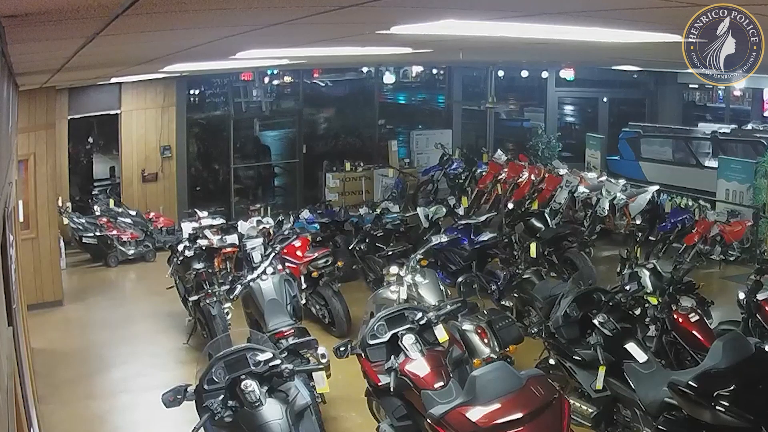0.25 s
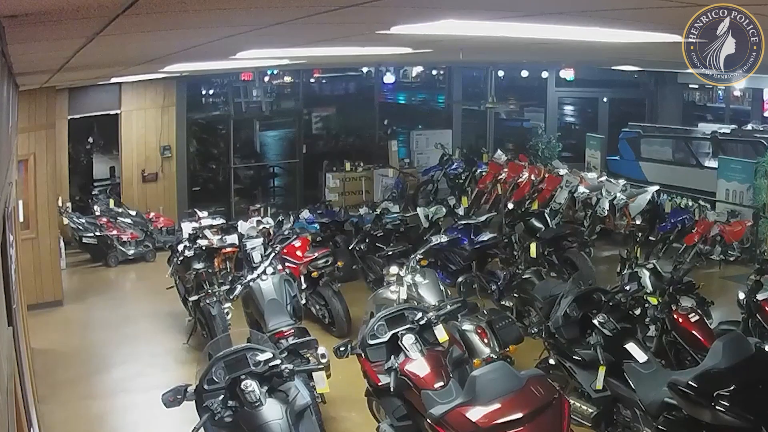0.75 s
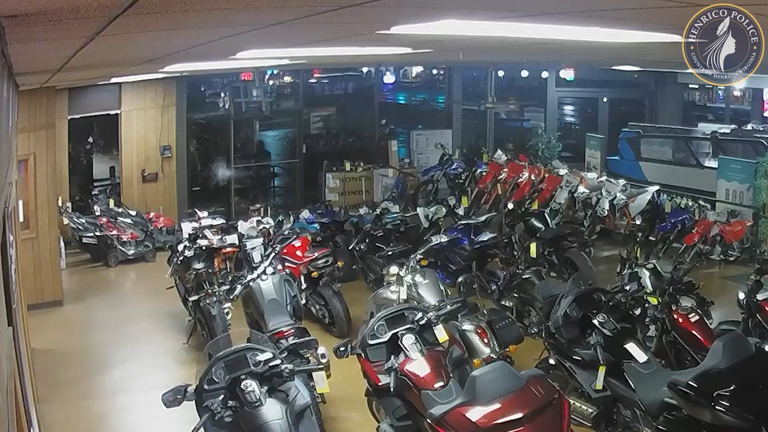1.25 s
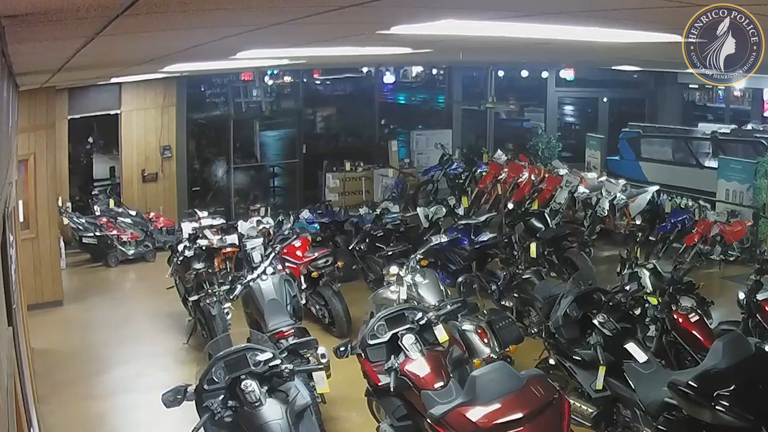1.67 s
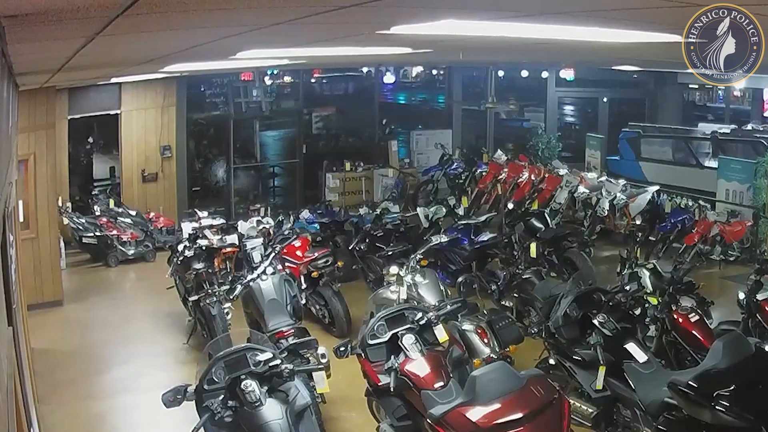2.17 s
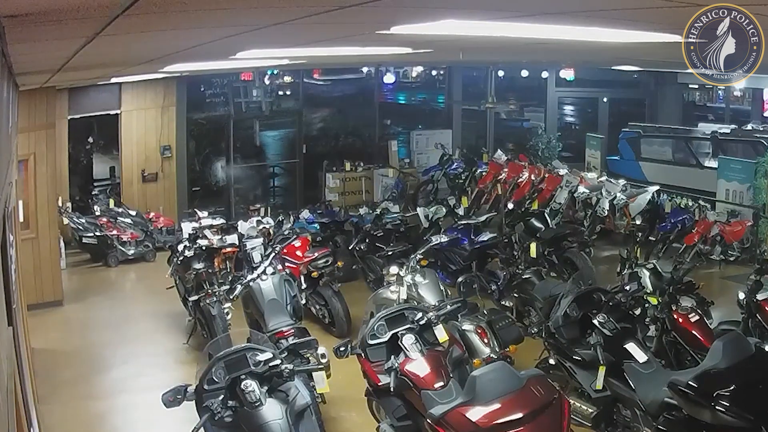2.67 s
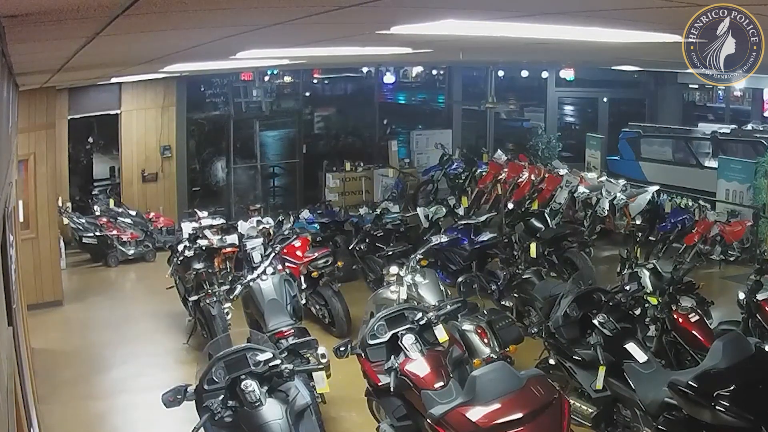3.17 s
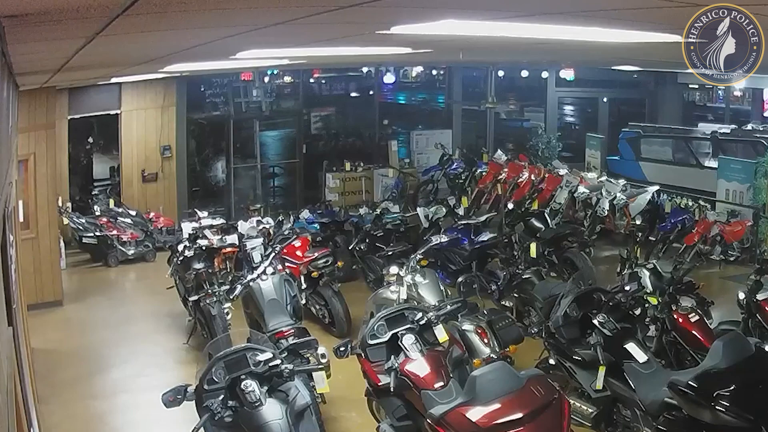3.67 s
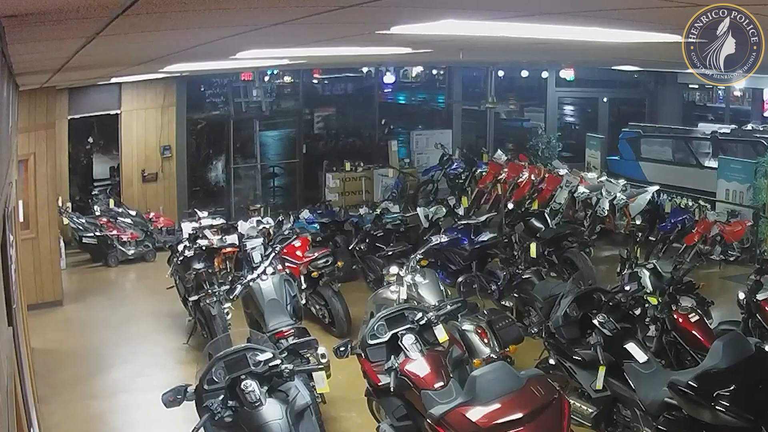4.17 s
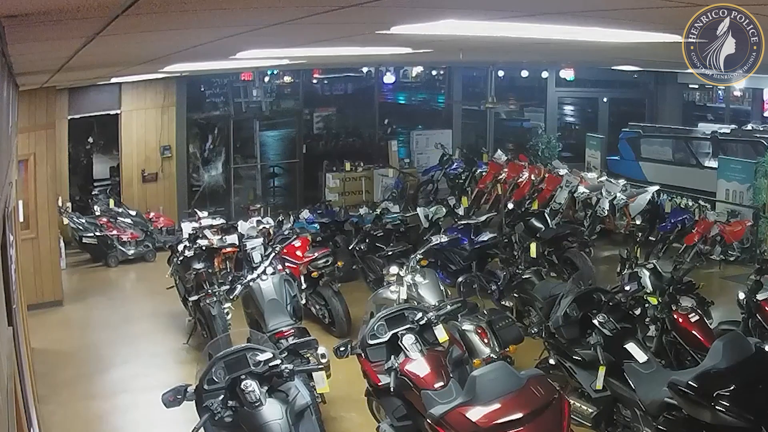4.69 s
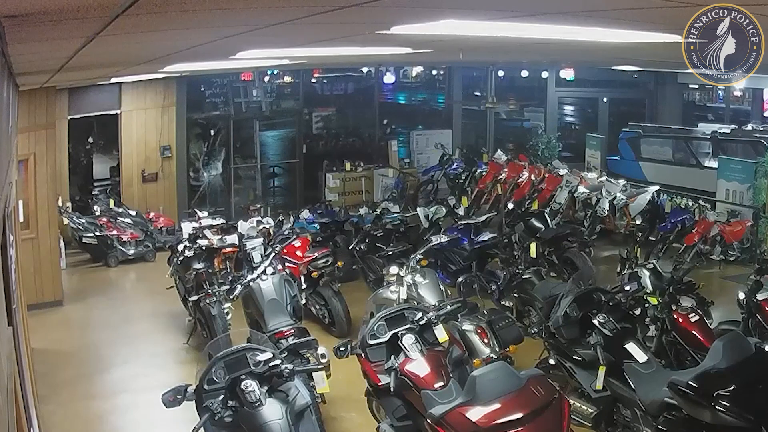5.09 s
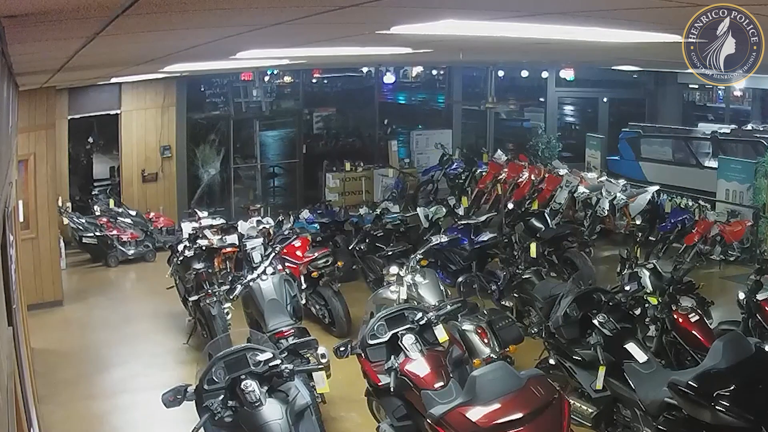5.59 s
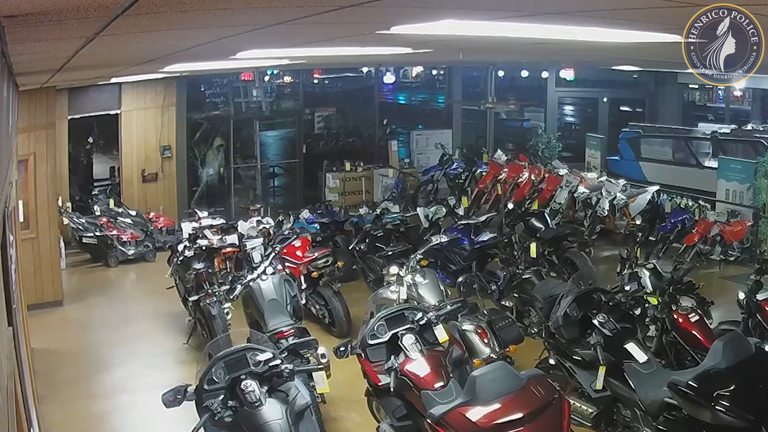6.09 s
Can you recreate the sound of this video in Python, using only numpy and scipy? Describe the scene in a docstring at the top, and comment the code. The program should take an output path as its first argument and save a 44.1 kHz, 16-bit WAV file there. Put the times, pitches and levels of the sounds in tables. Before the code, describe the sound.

Three heavy blows crack a glass door in a large echoing showroom, then shoves crunch, snap and grind the broken pane as chips trickle.

```python
"""Glass door broken in

A glass door at the far end of a large showroom takes three heavy blows, then is pushed in: the cracked
pane crunches, squeaks in its frame and sheds chips, over a faint low rumble. Impacts are decaying noise,
crumbling is a dense train of tiny ringing breaks, squeaks are gliding sines, and the hall is convolution
with echoes and a long tail. A resonant microphone port, overload, limiter and band limit colour it all."""
import sys
import numpy as np
from scipy import signal
from scipy.fft import rfft, irfft
from scipy.io import wavfile
from scipy.ndimage import uniform_filter1d, map_coordinates

SR = 44100
rng = np.random.default_rng(int(sys.argv[2]) if len(sys.argv) > 2 else 0)


def wav_out(sig):
    """Save sig, one row per channel (or a flat mono array), as 16-bit PCM at SR to the path in sys.argv[1]."""
    wavfile.write(sys.argv[1], SR, np.round(np.clip(np.atleast_2d(sig).T, -1, 1) * 32767).astype(np.int16))


N = 279594  # length [samples]

# Blows on the pane: (time [s], first touch level [dB], blow level [dB], thud level [dB],
# crumbling level [dB], crumbling hold [s])
BLOWS = [(0.049, -17, 1.5, 1, -12, 0.049), (1.291, -16.5, 1.5, -1.5, -15, .12),
         (2.517, -1.5, 6, -3, -15.5, 0.15)]
# Shoves against the shattered pane: (time [s], rise [dB/s], hold [s], crunch level [dB], flexing level [dB])
SHOVES = [(3.08, 204, 0.053, -42.5, -55), (3.285, 401, .08, -43, -48), (3.424, 216.5, 0.018, -27.5, -47.5),
          (3.626, 201.5, 0.2, -33, -41.5), (4.025, 139, 0.054, -20, -50.5),
          (4.362, 302.5, 0.064, -26.5, -57), (4.466, 250, 0.32, -14.5, -33),
          (5.068, 195.5, 0.034, -26, -49.5), (5.45, 706, .11, -21.5, -45.5),
          (5.621, 199.5, .04, -26.5, -55.5), (5.805, 195, 0.11, -36.5, -55.5),
          (6.135, 951, 0.14, -14.5, -33)]
# Spectrum of snapping and grinding glass: (frequency [Hz], level [dB])
CRUNCH_SPECTRUM = [(60, -33.5), (400, -15), (1000, -10.5), (2000, -9), (3200, 1), (5000, -5), (7000, -10)]
# Spectrum of the pane knocked or bent as a whole: (frequency [Hz], level [dB])
FLEX_SPECTRUM = [(20, -7.5), (60, -0.5), (140, 0), (250, 8.5), (420, 2.5), (750, 1), (1500, -1.5),
                 (4000, -27.5)]

RELEASE_DB_PER_S = 138.5  # crunch and trickle ebb at this slope


def amp(db):
    """Level to amplitude ratio: 20 dB is a factor of ten."""
    return 10 ** (np.asarray(db) / 20)


def unit(x):
    """Normalisation to an rms of 1."""
    return x / np.sqrt(np.mean(x ** 2) + 1e-20)


def along(points, hz):
    """Interpolation of (frequency, value) points on a logarithmic frequency axis."""
    f, v = np.transpose(points)
    return np.interp(np.log(hz + 1), np.log(f + 1), v)


def add(track, s, sound):
    """Superposition: mixes a sound into the track from time s [s]."""
    start = max(round(s * SR), 0)
    part = sound[:max(N - start, 0)]
    track[start:start + len(part)] += part


def response(points, size=8192):
    """Minimum phase: folding the cepstrum gives a causal impulse response with the given spectrum."""
    log_magnitude = np.log(amp(along(points, np.fft.rfftfreq(size, 1 / SR))))
    cepstrum = irfft(log_magnitude)
    cepstrum[1:size // 2] *= 2
    cepstrum[size // 2 + 1:] = 0
    return irfft(np.exp(rfft(cepstrum)))


def colour(x, points):
    """Linear filtering: convolution with the response of that spectrum."""
    return signal.fftconvolve(x, response(points))[:N]


def low_pass(x, hz):
    """Band limitation by a steep elliptic filter."""
    return signal.sosfilt(signal.ellip(12, .1, 90, hz, fs=SR, output="sos"), x)


def burst(t60):
    """Exponential decay: noise that falls by 60 dB in t60 [s]."""
    t = np.arange(SR // 2) / SR
    return rng.standard_normal(len(t)) * amp(-60 * t / t60)


def wobble(rate):
    """Band-limited random modulation: a smooth curve through `rate` random knots a second."""
    knots = np.arange(N) * rate / SR
    return map_coordinates(rng.standard_normal(int(knots[-1]) + 4), [knots])


def effort(t, start, hold, rise, release):
    """Force envelope: gain that builds, holds and ebbs along straight slopes [dB/s]."""
    building = rise * np.maximum(start - t, 0)
    ebbing = release * np.maximum(t - start - hold, 0)
    return amp(-building - ebbing)


def fractures(rate, spread_db, pitch_hz, ring, snap, size=500):
    """Random impulse train: `rate` tiny breaks a second, each a snap and a fragment's ring, at rms 1."""
    rows = rng.random((int(rate * N / SR), 4))
    start = (rows[:, 0] * N).astype(int)
    strength = amp(spread_db * rows[:, 1] ** 2) * np.sign(rows[:, 2] - .5)
    hz = pitch_hz * 2 ** (2 * rows[:, 3] - 1)  # up to an octave either way
    t = np.arange(size) / SR
    rings = strength[:, None] * np.sin(2 * np.pi * hz[:, None] * t) * amp(-60 * t / ring)
    places = start[:, None] + np.arange(size)
    ringing = np.bincount(places.ravel(), rings.ravel(), N)[:N]
    snapping = np.bincount(start, strength, N)
    return unit(0.48 * unit(ringing) + snap * unit(snapping))


def blows():
    """Impact excitation: each blow cracks the pane, shakes door and frame, and sets off fractures."""
    # Spectra of cracking glass, shuddering door and coarse shards: (frequency [Hz], level [dB])
    strike_spectrum = [(100, -15.5), (500, 0.5), (800, 0), (1300, 3), (2200, -2), (3000, 0), (5000, 0.5),
                       (7000, 6)]
    thud_spectrum = [(20, -1), (60, 9), (120, 9), (190, 9.5), (250, 13.5), (400, 1), (540, 7.5), (720, 5),
                     (1000, -1), (1500, 2), (4000, -28.5)]
    shard_spectrum = [(60, -28), (400, -18), (1000, -14.5), (2000, -1.5), (2700, 3.5), (3300, 2),
                      (4500, -2), (7000, -19.5)]
    strike_t60_s, thud_t60_s = 0.098, .12
    attack_s, release_db_per_s = .04, 146  # fractures take a moment to spread, and then die out
    strike, thud, crumble = np.zeros((3, N))
    t = np.arange(SR) / SR
    for s, _, db, thud_db, crumble_db, hold in BLOWS:
        add(strike, s, amp(db) * burst(strike_t60_s))
        add(thud, s, amp(thud_db) * burst(thud_t60_s))
        spreading = 1 - np.exp(-t / attack_s)
        ebbing_db = release_db_per_s * np.maximum(t - hold, 0)
        add(crumble, s, amp(crumble_db - ebbing_db) * spreading)
    crumble = crumble * fractures(rate=400, spread_db=20.5, pitch_hz=2695, ring=0.011, snap=0.97)
    return colour(strike, strike_spectrum) + colour(thud, thud_spectrum) + colour(crumble, shard_spectrum)


def cracks():
    """Sudden stress release: a snap and a pane knock, alone, just ahead of blows, and as shoves take hold."""
    # Single cracks: (time [s], snap level [dB], knock level [dB])
    single_cracks = [(.095, 9, -9), (.738, -50.5, -36), (1.503, -5, -23), (1.924, -15.5, -52),
                     (2.141, -13, -24), (2.364, -27, -63.5), (2.504, -6, -9), (2.877, -14, -16.5),
                     (3.266, -24, -27.5), (4.014, -10, -43.5), (4.509, -3, -12.5), (4.657, -4, -26),
                     (4.915, -11, -21.5), (5.04, -15, -25.5), (5.191, -12, -29.5), (5.452, -11.5, -24),
                     (5.505, -10, -19.5)]
    touch_lead_s = 0.0052  # the tool touches the glass this long before its full weight lands
    touch_knock_db = -3.5  # relative to the snap of that touch
    give_snap_db, give_knock_db = 6.5, -21.5  # as the pane gives way, relative to that shove's crunch
    touches = [(s - touch_lead_s, db, db + touch_knock_db) for s, db, *_ in BLOWS]
    gives = [(s, db + give_snap_db, db + give_knock_db) for s, _, _, db, _ in SHOVES]
    snaps, knocks = np.zeros((2, N))
    for s, db, knock_db in list(single_cracks) + touches + gives:
        add(snaps, s, amp(db) * burst(t60=0.0071))
        add(knocks, s, amp(knock_db) * burst(t60=0.024))
    return colour(snaps, CRUNCH_SPECTRUM) + colour(knocks, FLEX_SPECTRUM)


def push():
    """Friction and bending: with each shove fragments grind and break while the whole pane flexes."""
    # Spectrum of the heavy frame: (frequency [Hz], level [dB])
    frame_spectrum = [(20, 9), (55, 16), (130, 20.5), (250, -0.5), (600, -21), (2000, -41)]
    flex_lag_s, flex_release_db_per_s = 0.019, 124.5  # the whole sheet follows a little late
    lurch_db = 3.5  # unevenness of the bending
    t = np.arange(N) / SR
    grinding = np.max([amp(db) * effort(t, s, hold, rise, RELEASE_DB_PER_S)
                       for s, rise, hold, db, _ in SHOVES], axis=0)
    bending = np.max([amp(db) * effort(t, s + flex_lag_s, hold, rise, flex_release_db_per_s)
                      for s, rise, hold, _, db in SHOVES], axis=0)
    crunch = grinding * fractures(rate=900, spread_db=22.5, pitch_hz=3580, ring=0.0091, snap=1.014)
    flex = bending * unit(amp(lurch_db * wobble(rate=45)) * rng.standard_normal(N))
    # squared, so that chiefly the hardest shoves move the heavy frame as well
    sway = amp(19.5) * bending ** 2 * rng.standard_normal(N)
    return colour(crunch, CRUNCH_SPECTRUM) + colour(flex, FLEX_SPECTRUM) + colour(sway, frame_spectrum)


def trickle():
    """Sparse random impacts: loose chips keep dropping out of the broken pane."""
    # Spells of falling chips: (start [s], end [s], level [dB])
    spells = [(1.703, 2.341, -49), (2.8, 5.847, -46.5)]
    # Spectrum of their patter: (frequency [Hz], level [dB])
    chip_spectrum = [(100, -25.5), (500, -5), (1200, -6.5), (3000, -1), (7000, -4.5)]
    t = np.arange(N) / SR
    flow = sum(amp(db) * effort(t, start, end - start, RELEASE_DB_PER_S, RELEASE_DB_PER_S)
               for start, end, db in spells)
    patter = flow * fractures(rate=160, spread_db=18.5, pitch_hz=1805, ring=0.017, snap=.7)
    return colour(patter, chip_spectrum)


def splinters():
    """Driven resonance: chattering contact noise excites the brief ring of each loose sliver as it lands."""
    # Ringing slivers: (time [s], pitch [Hz], level [dB])
    slivers = [(.886, 5140, -26.5), (.886, 3740, -32), (.951, 3600, -33.5), (1.07, 3720, -32.5),
               (1.07, 5860, -34), (2.141, 3680, -10.5), (2.146, 3280, -14), (3.566, 2700, -11)]
    ring_t60_s = .01
    out, t = np.zeros(N), np.arange(SR // 2) / SR
    for s, hz, db in slivers:
        chatter = burst(t60=0.045)
        mode = amp(-60 * t / ring_t60_s) * np.sin(2 * np.pi * hz * t)
        ring = signal.fftconvolve(chatter, mode)[:len(t)]
        add(out, s, amp(db) * (ring / np.linalg.norm(ring) + 0.2 * chatter / np.linalg.norm(chatter)))
    return out


def squeaks():
    """Stick-slip: the glass edge rubs in its seal at an unsteady, gliding rate, heard as a wavering sine."""
    # Rubs in the seal: (time [s], length [s], start pitch [Hz], end pitch [Hz], level [dB])
    seal_rubs = [(3.405, 0.04, 581, 458, -40.5), (3.406, 0.059, 938, 996, -41.5),
                 (3.599, 0.021, 740, 602, -39), (3.615, 0.049, 566, 488, -37.5),
                 (3.61, 0.093, 947, 1029, -40.5), (4.661, 0.026, 807, 706, -23),
                 (5.445, 0.03, 1040, 995, -34.5)]
    out = np.zeros(N)
    for s, length, start_hz, end_hz, db in seal_rubs:
        n = int(length * SR)
        slip, grip = (unit(uniform_filter1d(rng.standard_normal(SR // 4), size=90))[:n] for _ in range(2))
        hz = np.linspace(start_hz, end_hz, n) * (1 + 0.09 * slip)
        phase = 2 * np.pi * np.cumsum(hz) / SR
        add(out, s, amp(db + 2.5 * grip) * np.hanning(n) * np.sin(phase))
    return out


def hall(x, early_db, early_t60, tail_db, count=6):
    """Reverberation: ever-changing spots of the pane each have their own wall echoes and long tail."""
    # Reverberation time of the hall: (frequency [Hz], t60 [s])
    reverberation = [(60, 1), (200, 0.91), (600, 0.72), (1400, 0.88), (2800, 0.91), (4000, 0.95),
                     (5400, 0.69), (7000, 0.48)]
    hz, t, z = signal.stft(rng.standard_normal((count, SR)), SR, nperseg=256)
    decay = amp(-60 * t / along(reverberation, hz)[:, None])
    tails = signal.istft(z * decay, SR, nperseg=256)[1]
    delay = np.arange(tails.shape[1]) / SR
    sparse = rng.random(tails.shape) < 350 / SR  # about 350 echoes a second
    echoes = rng.standard_normal(tails.shape) * sparse * amp(-60 * delay / early_t60)
    paths = sum(amp(db) * h / np.linalg.norm(h, axis=1, keepdims=True)
                for db, h in [(tail_db, tails), (early_db, echoes)])
    spots = np.array([wobble(rate=70) for _ in range(count)])
    spots = spots / np.linalg.norm(spots, axis=0)  # constant total power
    return signal.fftconvolve(x * spots, paths, axes=1).sum(axis=0)[:N]


def rumble():
    """Stationary filtered noise: a faint low background that holds, then fades away."""
    # Spectrum of the background: (frequency [Hz], level [dB])
    hush_spectrum = [(20, -3), (45, 2), (70, -9), (110, -20), (300, -28.5), (800, -57.5), (3000, -49.5),
                     (7000, -60)]
    level_db, hold_s, fade_db_per_s = -58, 3.1, 11
    fade_db = fade_db_per_s * np.maximum(np.arange(N) / SR - hold_s, 0)
    return amp(level_db - fade_db) * unit(colour(rng.standard_normal(N), hush_spectrum))


def scene():
    """Direct plus reverberant field over a faint rumble; the level dips briefly before the later blows."""
    # Brief dips of the level: (start [s], end [s], level [dB])
    dips = [(1.222, 1.27, -18), (2.451, 2.494, -16)]
    t = np.arange(N) / SR
    crashes = blows()
    crunch = push() + trickle()
    snaps = cracks() + splinters()
    rubs = squeaks()
    direct = amp(-8.5) * crashes + amp(-9.5) * crunch + amp(-6.5) * snaps + amp(1.5) * rubs
    room = hall(crashes + crunch + snaps + amp(-3) * rubs, early_db=-2.5, early_t60=.22, tail_db=-4.5)
    dips_db = sum(db * ((t > start) & (t < end)) for start, end, db in dips)
    dip_gain = amp(uniform_filter1d(1. * dips_db, size=300))
    return ((direct + room + rumble()) * dip_gain)[None]


def overload(x, top, hardness):
    """Saturation: rounded clipping towards `top`."""
    return x / (1 + np.abs(x / top) ** hardness) ** (1 / hardness)


def limiter(x, ceiling_db, size=900):
    """Gain reduction: turns down wherever the short-term rms level exceeds a ceiling."""
    level = np.sqrt(np.abs(uniform_filter1d(x ** 2, size)) + 1e-12)
    gain = np.minimum(1, amp(ceiling_db) / level)
    return x * uniform_filter1d(gain, size)


def late_gain(x, idle_db, trigger):
    """Delayed gain control: gain idles high and steps down a moment after the first loud sound."""
    lag = round(.101 * SR)
    loud_yet = np.maximum.accumulate(np.abs(x)) > trigger
    tripped = np.pad(loud_yet, (lag, 0))[:N]
    return x * amp(idle_db * (1 - uniform_filter1d(tripped.astype(float), size=60)))


def record(dry):
    """Resonance and saturation: port, overloaded preamp, limiter, narrow band, then a clipping output."""
    # Sharp resonance of the microphone port: (frequency [Hz], level [dB])
    port_spectrum = [(100, -15), (1000, -16.5), (1700, -11.5), (2200, -8.5), (2650, -5.5), (3000, -2),
                     (3290, 0), (3500, -5), (3700, -7.5), (4000, -11), (4600, -16), (5400, -21),
                     (7000, -28.5)]
    band_hz, top_hz, full_scale = 7350, 16400, .71
    x = colour(dry[0], port_spectrum) / np.linalg.norm(response(port_spectrum))
    x = overload(x, top=.45, hardness=12)
    x = limiter(x, ceiling_db=-10.0)
    x = low_pass(x, band_hz)
    x = late_gain(x, idle_db=3.5, trigger=.3)
    x = np.clip(x, -full_scale, full_scale)
    return low_pass(x, top_hz)[None]


dry = scene()
out = record(dry)
wav_out(out)
```